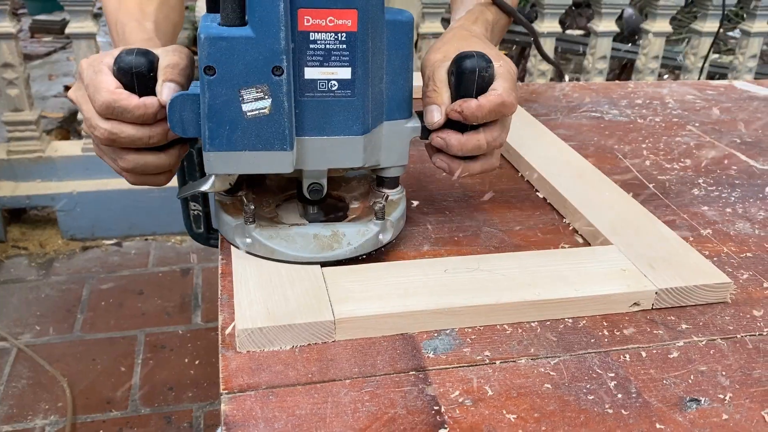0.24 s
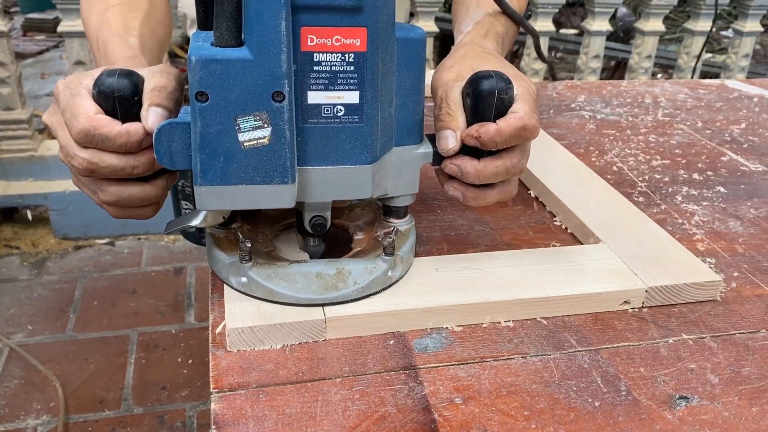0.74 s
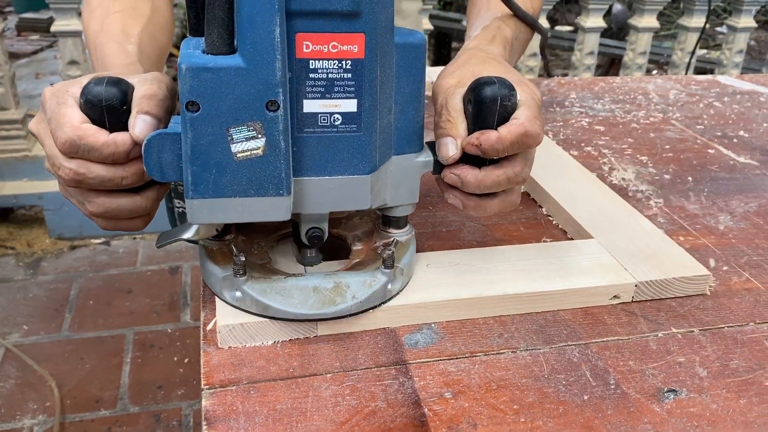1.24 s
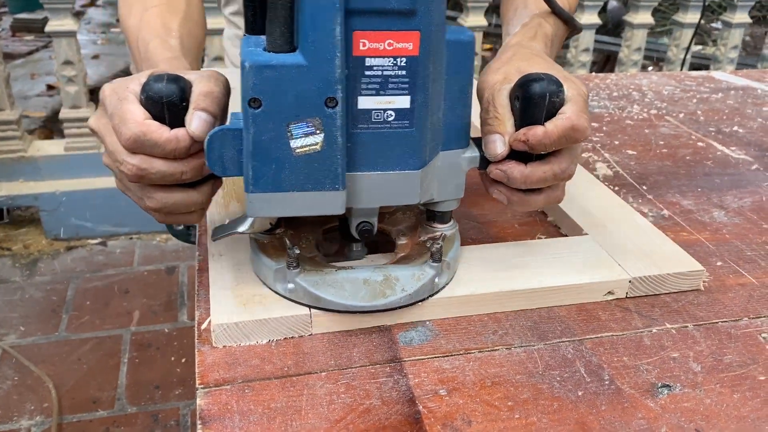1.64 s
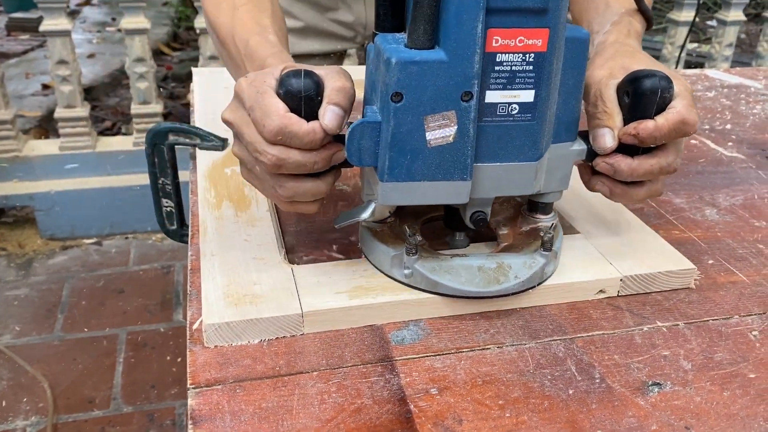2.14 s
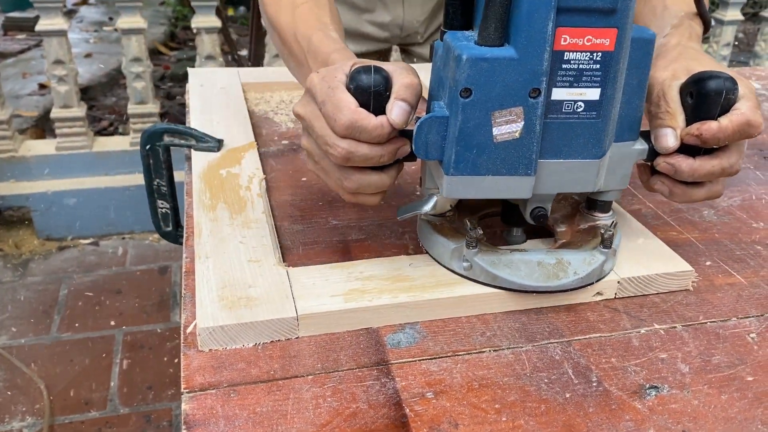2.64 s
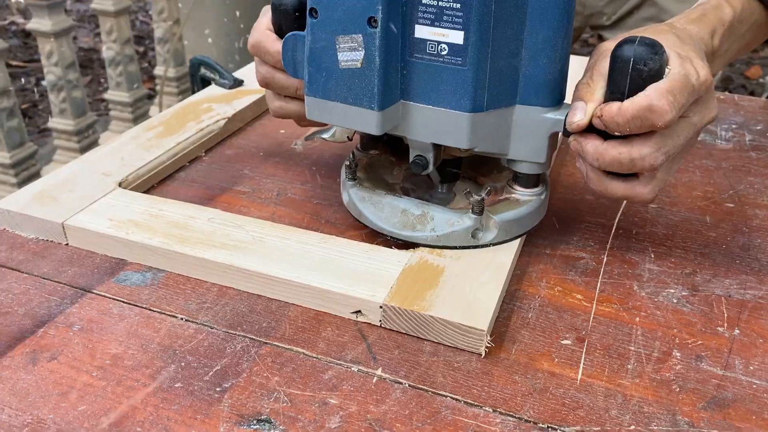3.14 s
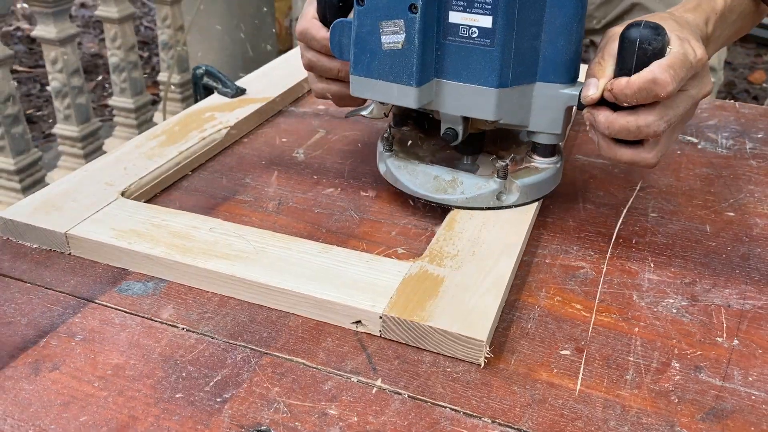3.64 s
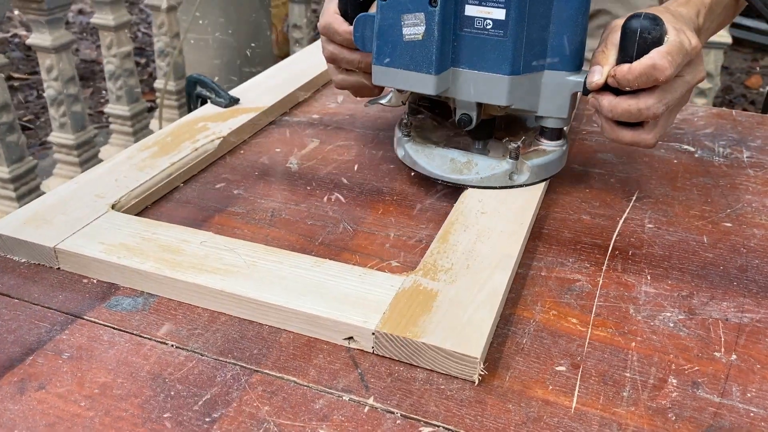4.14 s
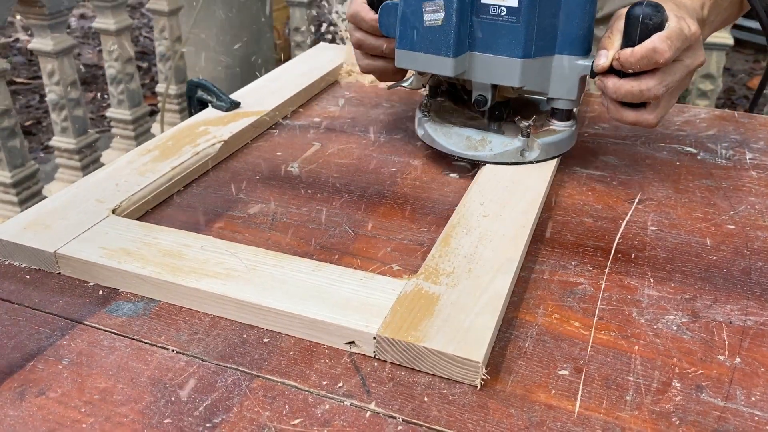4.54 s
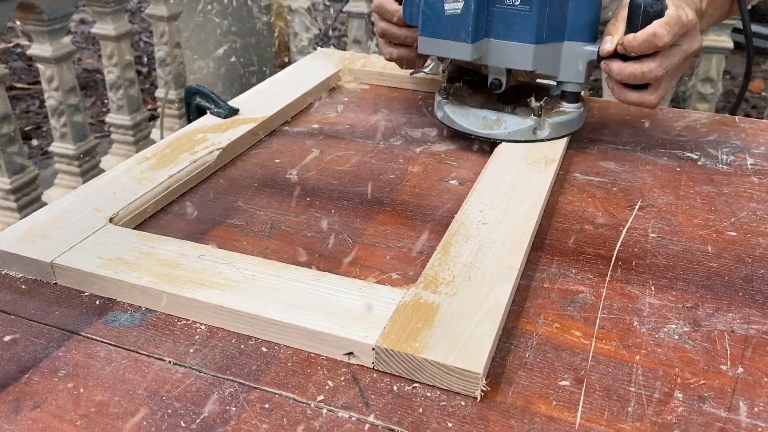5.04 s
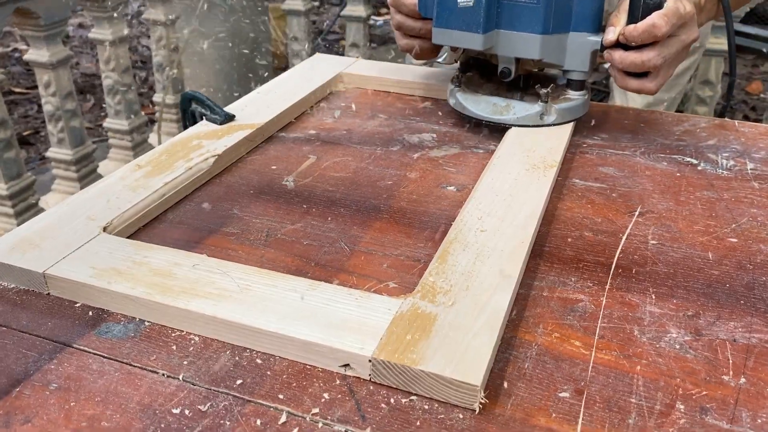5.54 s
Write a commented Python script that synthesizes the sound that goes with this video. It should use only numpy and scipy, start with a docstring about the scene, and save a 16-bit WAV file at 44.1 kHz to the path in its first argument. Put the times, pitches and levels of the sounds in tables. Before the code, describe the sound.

A power router whines at a high pitch while cutting wood, over a steady rush of air and hissing chips.

```python
"""On an outdoor bench, about a metre away, a plunge router trims the inner edge of a wooden frame.
Its shaft whines at whole multiples of the turn rate, and the pitch sags as the bit bites.
The housing roars, cooling air rushes, wood chips hiss and the motor hums underneath.
The sound swells in, heard from the front, dips for an instant and goes on from the bench's corner."""
import sys
import numpy as np
from scipy import signal
from scipy.fft import rfft, irfft
from scipy.io import wavfile
from scipy.ndimage import uniform_filter1d, map_coordinates

SR = 44100
rng = np.random.default_rng(int(sys.argv[2]) if len(sys.argv) > 2 else 0)


def store_pcm(level_fs):
    """Save levels as 16-bit WAV."""
    pcm = np.round(np.clip(level_fs, -1, 1) * 32767).astype(np.int16)
    wavfile.write(sys.argv[1], SR, np.atleast_2d(pcm).T)


N = 256220
TIME = np.arange(N) / SR
FREQS = np.arange(N // 2 + 1) * SR / N
SIDES = np.array([[1], [-1]])  # left, right
FRONT, CORNER = 0, 1  # the two listening spots
# Four stages: the bit runs free, grazes, cuts (heard from the front), cuts (heard from the corner).
GRAZE_S, GRAZE_RISE_S = 0.976, 0.18
BITE_S, BITE_RISE_S = 1.694, 0.074
BREAK_START_S, BREAK_END_S = 3.103, 3.1188

# The tool drifts from the left towards the middle. "Pan" is the left level minus the right.
# t/s, head start of the left side/samples, extra pan of the whine/dB
TOOL_DRIFT = [(0, 1.35, -1), (1.6, 1.47, -3), (1.9, 0.48, -1.5), (2.8, .4, -4), (3.12, 0.32, -4.5),
              (4.3, 0.28, -0.5), (5.1, 0.34, 0.5), (5.8, 0.41, 3)]


def router():
    """The whole tool: tones tied to the shaft, a flickering rush of air and chips, and a hum."""
    # Rows: housing roar, cooling air, chip hiss. Columns: level/dB in each of the four stages
    rush_levels = [(-44, -43, -44.5, -48.5), (-36.5, -36, -36.5, -39), (-37.5, -34.7, -35.5, -44)]
    roar_db, air_db, hiss_db = (by_stage(*db) for db in rush_levels)
    hiss_db = hiss_db + hiss_drift_db()
    angle = shaft_angle()
    tones = gain(-0.35) * whine(angle)
    tones += gain(hiss_db + 1.0) * whistles(angle)
    tones += gain(roar_db - 1.1) * motor_hum()
    crackle = chips(angle)
    levels_db = [db + 0.67 * wander(25.04) for db in (roar_db, air_db, hiss_db)]
    noise = by_spot(rush(crackle, FRONT, levels_db), rush(crackle, CORNER, levels_db))
    rush_pan_db = by_stage(0.75, 1, -0.65, 0.13)
    return tones + stereo_gains(rush_pan_db).real * arrive_left_first(noise)


def shaft_angle(wobble=0.00077, wobble_hz=44.6):
    """How far the shaft has turned, in radians; deeper bites slow it, uneven grain makes it tremble."""
    # Shaft speed: t/s, turn rate/Hz
    speed = [(0, 1151), (0.3, 1101), (0.68, 1097), (1.16, 1117), (1.28, 1108), (1.43, 1129), (1.66, 1125),
             (1.79, 1074), (2.1, 1103), (2.2, 1089), (2.42, 1097), (2.55, 1110), (2.64, 1103), (2.8, 1115),
             (3.02, 1131), (3.1, 1127), (3.12, 1098), (3.47, 1066), (3.67, 1072), (3.83, 1070), (4.1, 1090),
             (4.25, 1075), (4.39, 1081), (4.55, 1066), (4.68, 1075), (5.01, 1067), (5.1, 1056),
             (5.42, 1067), (5.8, 1097)]
    turn_hz = curves(speed)[0] * (1 + wobble * wander(wobble_hz))
    return 2 * np.pi * np.cumsum(turn_hz) / SR


def whine(angle, scatter=0.069, flutter_hz=32, wander_hz=20):
    """Bit and fan sound 1 to 8 times the turn rate; shorter waves scatter more and aim more to one side."""
    # One row per multiple: base level/dB in each of the four stages, random wander/dB
    tone_levels = [(-45.5, -46, -42.7, -38.6, 1.1), (-39, -40, -39, -35.5, 2.1),
                   (-33.2, -46, -44.8, -48.5, 3.2), (-34.5, -31, -28, -34, 0.23),
                   (-45.5, -43, -44.5, -50, 1.8), (-45.5, -43, -48.5, -46, 2.4),
                   (-44.5, -45, -48, -66, 2.6), (-53, -46.5, -46, -48, 2.2)]
    # Where each multiple sits: pan/dB (front, corner), head start of the left side/rad (front, corner)
    tone_places = [(-0.5, 0, 0.25, 0.1), (7, -2.5, 1.36, -0.0079), (5.5, 6.5, 0.77, -0.23),
                   (10.5, 1, 0.083, -0.62), (9, 0.5, 1.8, -1.73), (-2, -1, 1.6, -0.3), (11, -2, .4, -0.64),
                   (9, 3, 0.3, 0.59)]
    # Slow swings of multiples 2, 4 (the loudest) and 5 (sings out late in the cut): t/s, change/dB
    second_swing = [(0, 4), (.18, 8.5), (.42, -1), (.75, 0), (1.06, -9.5), (1.2, 1.5), (1.6, 2), (1.9, 1),
                    (2.06, -8.5), (2.36, 0), (2.52, -8), (3.1, -4.5), (3.4, -0.5), (3.68, -1.5), (4.1, 6.5),
                    (4.74, 0), (4.89, -8.5), (5.1, -0.5), (5.7, -3.5)]
    fourth_swing = [(0, 1.5), (1.0, 0), (1.3, -6), (1.41, 1), (1.7, 4), (1.83, -3), (2.11, 6.5),
                    (2.21, -0.5), (2.35, 2), (2.74, 0.5), (3.01, -10.5), (3.26, 3), (3.42, 7), (3.57, 1),
                    (3.791, 2.5), (3.95, -8), (4.18, 3.5), (4.3, 2), (4.64, -2), (5.1, 4), (5.55, -4.5),
                    (5.8, -5)]
    fifth_swing = [(0, 1), (.3, 9), (.9, -5), (1.27, 0), (1.47, -16), (1.72, 1), (2.82, 0.5), (3.07, 8),
                   (3.38, -13), (3.62, 2.5), (4.08, 6.5), (4.46, -7), (4.54, 8.5), (5.3, 17), (5.769, 2)]
    second, fourth, fifth = (curves(table)[0] for table in (second_swing, fourth_swing, fifth_swing))
    swing_db = {1: by_spot(0, 0.75) * second, 2: second, 4: fourth, 5: fifth, 6: 0.5 * fifth}
    drift_pan_db = curves(TOOL_DRIFT)[1]
    wander_share = by_stage(0.65, 1, 1.4, 0.64)
    out = 0
    for k, ((*stage_db, wander_db), place) in enumerate(zip(tone_levels, tone_places), 1):
        level_db = by_stage(*stage_db) + swing_db.get(k, 0) + squeal_db(k)
        level_db += wander_share * wander_db * wander(wander_hz)
        pan_db = by_spot(*place[:2]) + drift_pan_db * min(k / 4, 1)
        gains = stereo_gains(pan_db, lead_rad=by_spot(*place[2:]))
        out = out + gain(level_db) * reflected_tone(k * angle, scatter * k, flutter_hz, gains)
    return out


def squeal_db(multiple):
    """One multiple's brief changes in level: it squeals as the bit catches, or fades for a moment."""
    # Rises and dips: middle t/s, length/s, lowest multiple, highest multiple, change/dB
    squeals = [(1.29, .09, 6, 8, 4.3), (1.715, 0.12, 2, 3, 10.7), (1.735, .08, 12, 12, 12),
               (1.765, 0.032, 3, 3, 9.6), (1.78, 0.05, 6, 7, 6.2), (2.142, .04, 3, 3, 12),
               (2.16, 0.084, 2, 2, 11.5), (2.86, .18, 3, 3, 7), (3.06, 0.046, 3, 3, 6.1),
               (3.2, 0.32, 2, 3, 9.3), (3.22, .22, 12, 12, 4), (5.07, 0.029, 3, 4, 4.3),
               (5.26, 0.061, 3, 3, 9), (5.765, 0.13, 2, 2, 5.26), (5.77, .13, 3, 3, 15.7),
               (5.765, 0.12, 12, 12, 10)]
    dips = [(.16, 0.11, 3, 3, -18), (.25, 0.75, 1, 1, -5), (.6, .1, 2, 2, -7), (1.25, 0.053, 3, 4, -9),
            (1.57, 0.3, 1, 1, -11), (2.26, .06, 2, 2, -10), (4.85, .05, 1, 1, -7),
            (5.691, 0.041, 3, 4, -11)]
    return sum(db * np.exp(-(2 * (TIME - middle) / length) ** 2)  # a bell curve
               for middle, length, lowest, highest, db in squeals + dips
               if lowest <= multiple <= highest)


def whistles(angle, wander_db=3.2, wander_hz=8):
    """Thin, high multiples of the turn rate that come and go."""
    # Multiple, level/dB relative to the chip hiss (front, corner)
    overtones = [(9, -13.5, -9), (10, -17.5, -14), (11, -16, -18), (12, -21, -10.5), (13, -18, -23),
                 (14, -17, -15)]
    out = 0
    for k, *spot_db in overtones:
        level_db = by_spot(*spot_db) + squeal_db(k) + wander_db * wander(wander_hz)
        out = out + gain(level_db) * reflected_tone(k * angle, scatter=0.49, flutter_hz=20)
    return out


def chips(angle, throb=0.062, grain_db=1.1):
    """Two noise streams of tiny breaks in the wood, strongest once a turn as the cutting edge hits."""
    sizes = gain(grain_db * wander(1500)) * (1 + throb * np.cos(angle))
    return rng.standard_normal((2, N)) * sizes / np.sqrt(np.mean(sizes ** 2))


def rush(crackle, spot, levels_db, roar_top_hz=2400, air_top_hz=8570):
    """Noise shaped by housing and bench: roar at the bottom, cooling air between, chip hiss on top."""
    # Tone colour of the noise: f/Hz, relative level/dB (front, corner)
    rush_colour = [(40, -52, -50), (85.4, -34, -40), (128, -21, -19.5), (162, -17.5, -16.5),
                   (412, -13, -11), (860, -8, -4.5), (1160, -3.5, -2), (1760, 2.5, 1.5), (2310, -1.5, -1),
                   (3860, 0.5, 4.5), (5170, -5, 0), (7800, -2, 2.5), (12360, 11.5, 12.5), (15600, 5, 9.5)]
    # Stereo spread: f/Hz, likeness of left and right (0 to 1), pan/dB
    rush_width = [(150, 0.99, -1), (1430, 0.92, -1), (2390, 0.94, 0), (3500, 0.41, 2.5), (4500, 0.61, -6),
                  (6700, 0.052, 9.5), (7550, 0.22, -1), (8500, 0.54, -0.5), (12500, 0.79, -2),
                  (15500, 0.16, -0.5)]
    colour_hz, *colour_db = np.transpose(rush_colour)
    colour = gain(over_frequency(colour_hz, colour_db[spot]))
    width_hz, likeness, pan_db = np.transpose(rush_width)
    likeness = np.clip(over_frequency(width_hz, likeness), 0, 1)
    middle, side = rfft(crackle) * colour
    spectrum = middle + SIDES * side * np.sqrt((1 - likeness) / (1 + likeness))
    spectrum *= stereo_gains(over_frequency(width_hz, pan_db))
    roar, roar_and_air = (1 / (1 + (FREQS / top) ** 8) for top in (roar_top_hz, air_top_hz))
    bands = roar, roar_and_air - roar, 1 - roar_and_air
    cores_hz = (1250, 2000), (2500, 8000), (9000, 15000)  # each band's level is set in this range
    out = 0
    for band, db, (low, high) in zip(bands, levels_db, cores_hz):
        core_size = np.sqrt(np.mean(colour ** 2 * (FREQS > low) * (FREQS < high)))
        out = out + irfft(spectrum * band, N) / core_size * gain(db)
    return out


def hiss_drift_db(front_db_per_s=-0.3, corner_db_per_s=-0.9):
    """The chip hiss slowly fades as the bit travels along the edge; 0 dB halfway through each cut."""
    front_s = np.maximum(TIME, BITE_S) - (BITE_S + BREAK_START_S) / 2
    corner_s = TIME - (BREAK_END_S + TIME[-1]) / 2
    return by_spot(front_db_per_s * front_s, corner_db_per_s * corner_s)


def motor_hum():
    """Fixed pitches, alike on both sides: mains power pulls on the motor's iron and the housing rings."""
    # f/Hz, level/dB relative to the roar (front, corner)
    hum_tones = [(300, -27.5, -23.5), (600, -26, -35), (900, -32, -14), (1710, -17, -20),
                 (1845, -28, -12.5), (2002, -19.5, -26)]
    return sum(by_spot(*gain(db)) * reflected_tone(2 * np.pi * hz * TIME, scatter=1.0, flutter_hz=14)[0]
               for hz, *db in hum_tones)


def reflected_tone(angle, scatter, flutter_hz, gains=1):
    """A tone plus its echoes off hands, tool and bench; scatter sets how strong the echoes are."""
    # Complex numbers hold both the size and the phase of each side's shifting echo.
    echoes = np.array([wander(flutter_hz) + 1j * wander(flutter_hz) for _ in range(2)])
    wave = np.exp(1j * (angle + 2 * np.pi * rng.random()))
    return np.sqrt(2 / (1 + scatter ** 2)) * np.imag((gains + scatter * echoes) * wave)


def arrive_left_first(sound):
    """The sound reaches the left side a moment before the right."""
    shifts = SIDES * curves(TOOL_DRIFT)[0] / 2
    return np.array([map_coordinates(channel, [np.arange(N) + shift], order=5)
                     for channel, shift in zip(sound, shifts)])


def stereo_gains(pan_db, lead_rad=0):
    """Complex left and right gains; positive values make the left side louder and earlier."""
    gains = gain(SIDES * pan_db / 2) * np.exp(0.5j * SIDES * lead_rad)
    return gains / abs(gains.mean(axis=0))


def by_stage(free, graze, cut, corner):
    """Glide through the values of the first three stages, then jump to the corner's."""
    times = [GRAZE_S, GRAZE_S + GRAZE_RISE_S, BITE_S, BITE_S + BITE_RISE_S]
    return by_spot(np.interp(TIME, times, [free, graze, graze, cut]), corner)


def by_spot(front, corner):
    """The front value until the break starts, then the corner value."""
    return np.where(TIME < BREAK_START_S, front, corner)


def wander(rate_hz):
    """A smooth random curve, typically within about 1 of zero, with rate_hz new targets a second."""
    hold = max(int(SR / rate_hz), 2)
    steps = np.repeat(rng.standard_normal(N // hold + 1), hold)
    return 1.286 * uniform_filter1d(uniform_filter1d(steps, hold), hold)[:N]


def curves(table):
    """Join each column's points with straight lines; the first column gives the times."""
    times, *columns = np.transpose(table)
    return [np.interp(TIME, times, column) for column in columns]


def over_frequency(hz, values):
    """Join values with straight lines on a scale where every octave is equally wide."""
    return np.interp(np.log(FREQS + 1), np.log(hz), values)


def gain(db):
    """Turn decibels into a number to multiply by."""
    return 10 ** (np.asarray(db) / 20)


def scene():
    """The sound swells in; it dips for an instant as the scene changes from the front to the corner."""
    swell = np.minimum(0.015 + TIME / 1.66, 1)  # full size after about 1.6 s
    in_break = (TIME > BREAK_START_S) & (TIME < BREAK_END_S)
    return router() * swell * gain(-25 * in_break)


def record(dry, top_hz=15750):
    """Cut off the very highest treble steeply."""
    return signal.sosfilt(signal.ellip(12, 0.1, 90, top_hz, fs=SR, output="sos"), dry)


dry = scene()
out = record(dry)
store_pcm(out)
```